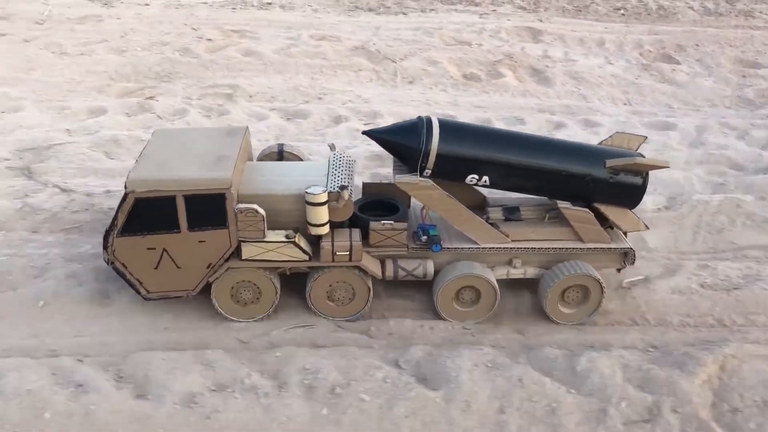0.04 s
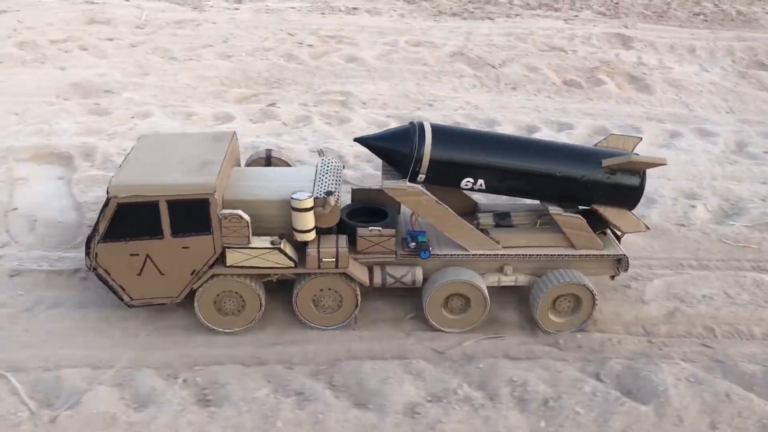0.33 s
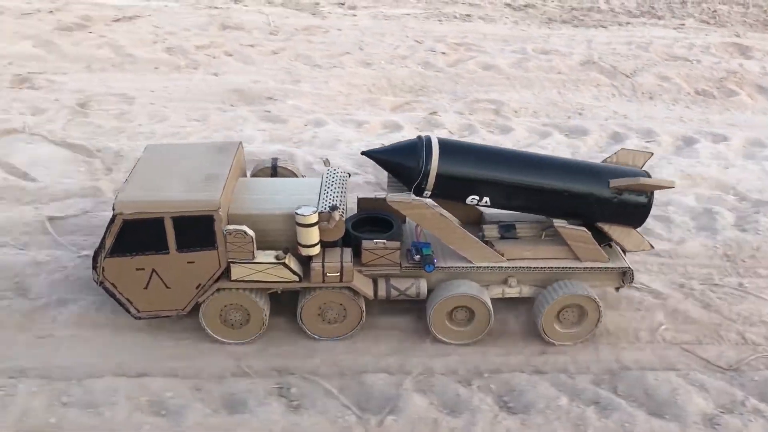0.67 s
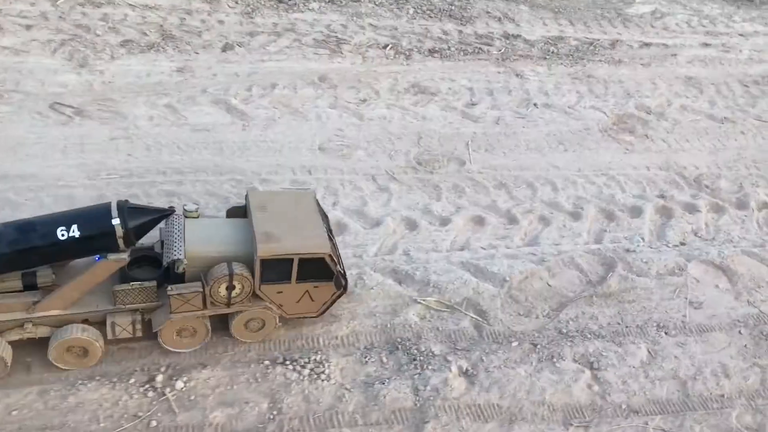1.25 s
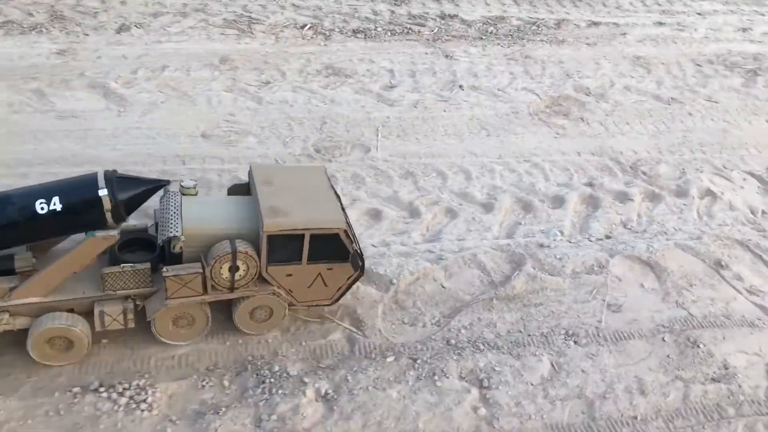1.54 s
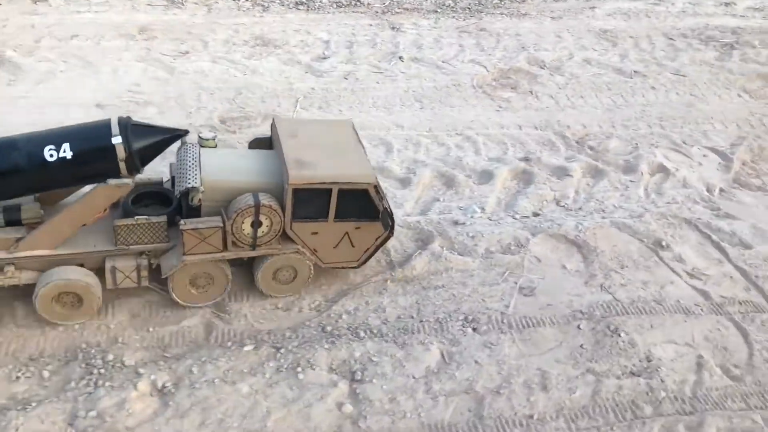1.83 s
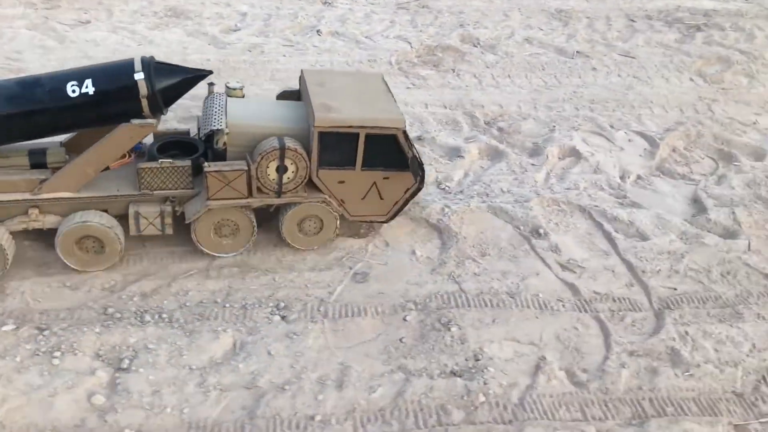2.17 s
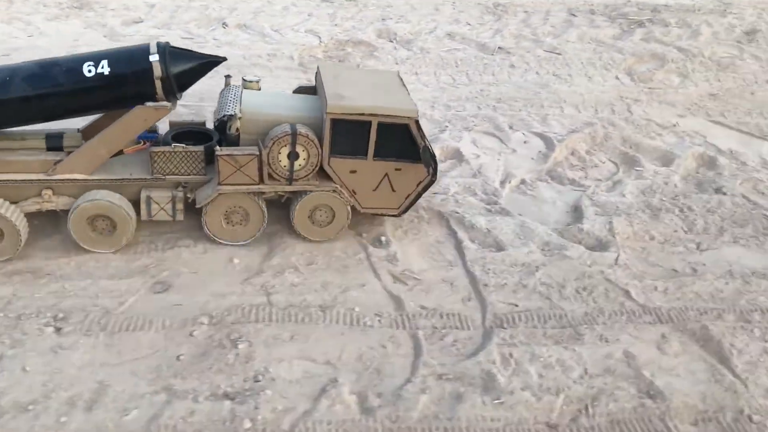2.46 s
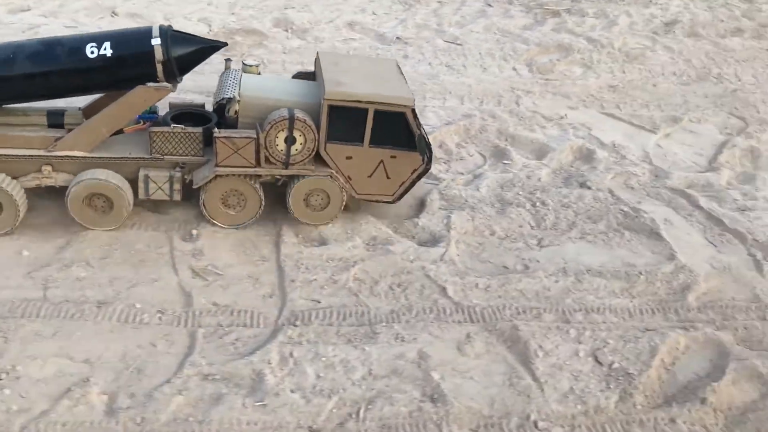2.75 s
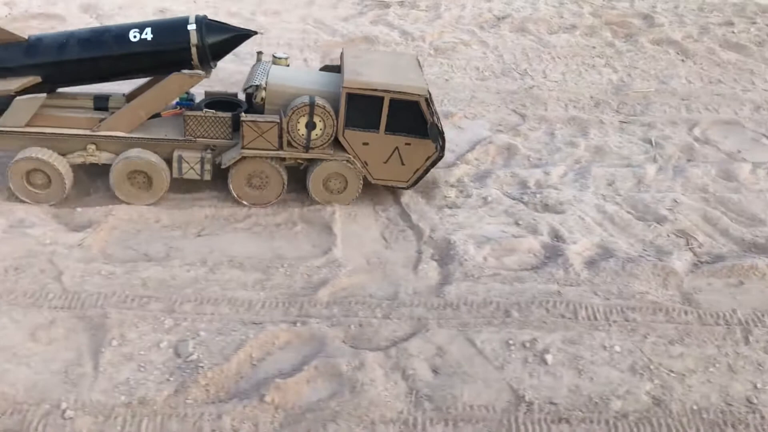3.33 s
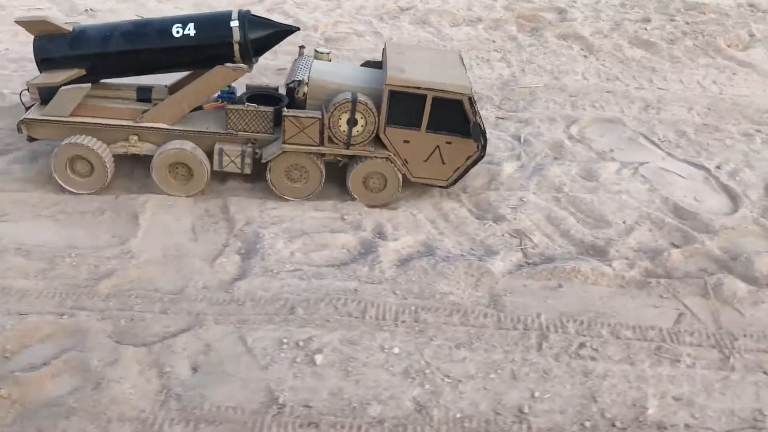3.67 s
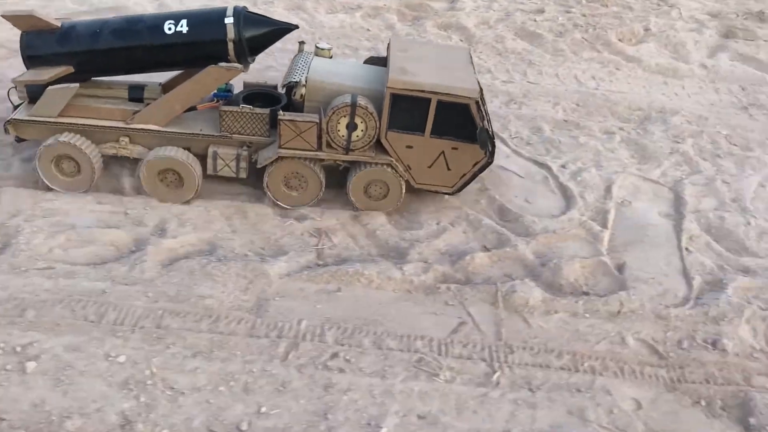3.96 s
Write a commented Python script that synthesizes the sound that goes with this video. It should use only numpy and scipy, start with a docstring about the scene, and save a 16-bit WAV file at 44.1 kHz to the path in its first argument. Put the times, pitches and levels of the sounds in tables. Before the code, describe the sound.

A toy truck's geared motor whines and rattles as it crawls over crunching sand.

```python
"""A toy truck's geared motor whines and rattles as the truck crawls over sand.
The motor surges and sags as the wheels grip; its teeth sound harmonics of the shaft rate and
excite the modes of the hollow body. Sand crunches under the tyres, the frame drums over ruts
and air buffets the microphone. The truck is heard from one side and, after a short break,
from the other."""
import sys
import numpy as np
from scipy import signal
from scipy.fft import rfft, irfft, next_fast_len
from scipy.io import wavfile
from scipy.ndimage import map_coordinates

SR = 44100
rng = np.random.default_rng(int(sys.argv[2]) if len(sys.argv) > 2 else 0)


def to_wav(s):
    """Save 16-bit WAV."""
    ch = np.atleast_2d(s).T  # columns
    pcm = np.round(np.clip(ch, -1, 1) * 32767)  # PCM
    wavfile.write(sys.argv[1], SR, pcm.astype(np.int16))


N = 176400
BREAK_S = 1.163  # the first side gives way to the second


def amp(db):
    """Amplitude ratio of a level in decibels."""
    return 10 ** (np.asarray(db) / 20)


def unit(x):
    """Normalisation to rms 1."""
    return x / np.sqrt(np.mean(x ** 2) + 1e-20)


def clock():
    """Time of each sample in seconds."""
    return np.arange(N) / SR


def curve(rows):
    """Linear interpolation of (seconds, value) rows."""
    return np.interp(clock(), *np.transpose(rows))


def eased(rows):
    """Half-cosine interpolation of (seconds, value) rows, with zero slope at each row."""
    times, values = np.transpose(rows)
    index = np.arange(len(times))
    at = np.interp(clock(), times, index)
    return np.interp(np.floor(at) + np.sin(np.pi / 2 * (at % 1)) ** 2, index, values)


def by_side(first, second):
    """A step from one value to another at the break."""
    return np.where(clock() < BREAK_S, first, second)


def bump(centre_s, half_length_s):
    """Gaussian envelope; the half-length is its standard deviation."""
    return np.exp(-.5 * ((clock() - centre_s) / half_length_s) ** 2)


def wobble(rate):
    """Smooth random modulation through rate knots a second."""
    return map_coordinates(rng.standard_normal(4096), [clock() * rate], mode="wrap")


def filtered(x, response):
    """Linear filtering: the spectrum of x times a frequency response."""
    size = next_fast_len(N + 8192)
    return irfft(rfft(x, size) * response(np.fft.rfftfreq(size, 1 / SR)), size)[:N]


def coloured(x, points):
    """Spectral shaping by (Hz, dB) points, at rms 1."""
    hz, db = np.transpose(points)
    return unit(filtered(x, lambda f: amp(np.interp(np.log(f + 1), np.log(hz), db))))


def resonance(f, hz, width):
    """Frequency response of a damped oscillator; width is its half-power bandwidth in Hz."""
    return 1j * f * width / (hz * hz - f * f + 1j * f * width)


def band_noise(hz, width):
    """White noise through two equal resonators in cascade, at rms 1."""
    return unit(filtered(rng.standard_normal(N), lambda f: resonance(f, hz, width) ** 2))


def blend(clicks, share):
    """Incoherent sum of clicks and white noise; share is the clicks' part of the power."""
    return np.sqrt(share) * unit(clicks) + np.sqrt(1 - share) * rng.standard_normal(N)


def grains(per_second, scatter_db=5.5, decay_s=.00043):
    """Shot noise: grains grate at random instants and their energy decays exponentially."""
    onsets = rng.random(N) < per_second / SR
    sizes = onsets * amp(scatter_db * np.minimum(rng.standard_normal(N), 2.4))
    energy = signal.lfilter([1], [1, -np.exp(-1 / (decay_s * SR))], sizes ** 2)
    return np.sqrt(energy) * rng.standard_normal(N)


def thumps():
    """Envelope of the low thumps as gusts of air buffet the microphone."""
    # Each row: centre in seconds, half-length in seconds, level in dB.
    buffets = [(0.17, 0.016, -41), (0.24, 0.0097, -42), (0.423, 0.006, -42), (0.79, 0.038, -48),
               (1.103, 0.015, -45.5), (2.012, 0.012, -42.5), (2.052, 0.0097, -45), (2.129, 0.0093, -38.5),
               (3.103, 0.014, -37.5), (3.495, 0.0049, -38.5), (3.534, 0.024, -42.5)]
    return sum(amp(db) * bump(s, half_length) for s, half_length, db in buffets)


def air():
    """Turbulence: air on the microphone makes a low rumble that swells with each thump."""
    # Each row: time in seconds, level in dB.
    rumble_levels = [(0, -41), (.1, -46.5), (.6, -47.5), (.9, -45), (1.1, -46), (1.22, -66), (1.45, -66),
                     (1.52, -53), (1.65, -69), (2, -60), (2.25, -62), (2.92, -68), (3.02, -46.5),
                     (3.3, -60), (3.5, -53), (4, -53)]
    # Each row: frequency in Hz, relative spectral level in dB.
    spectrum = [(20, -42), (40, -6), (68, 3), (110, -2.5), (155, -3), (220, -16), (320, -14), (700, -86),
                (2000, -90)]
    envelope = np.hypot(amp(curve(rumble_levels)), amp(-1.5) * thumps())
    return envelope * coloured(rng.standard_normal(N), spectrum)


def chassis():
    """Forced vibration: the frame drums as the wheels roll, harder at each thump."""
    # Each row: time in seconds, level in dB.
    rolling_levels = [(0, -52.5), (1.1, -54), (1.25, -60), (2.05, -53), (2.25, -59), (2.85, -57),
                      (3.1, -53), (3.3, -63), (4, -62)]
    envelope = np.hypot(amp(curve(rolling_levels)), amp(-.5) * thumps())
    return envelope * band_noise(hz=144, width=95)


def scrapes():
    """Friction: tyres and gears rub briefly, each time in a hollow band of noise."""
    # Each row: centre and half-length in seconds, pitch and resonator half-width in Hz, level in dB.
    rubs = [(0.45, 0.01, 4100, 450, -37), (0.517, 0.0051, 3630, 120, -41),
            (0.676, 0.0072, 3620, 120, -37.5), (.745, 0.01, 3460, 200, -39),
            (2.366, 0.0089, 1050, 111, -41.5), (2.384, 0.0052, 1380, 500, -40.5),
            (2.426, .01, 378, 49.6, -41.5), (2.633, 0.0054, 1620, 300, -44),
            (2.882, .005, 1150, 200, -46.5)]
    return sum(amp(db) * bump(s, half_length) * band_noise(hz, 2 * half_width)
               for s, half_length, hz, half_width, db in rubs)


def snaps(hold_s=.00037, t60_s=.011, relative_width=.71):
    """Impact: larger grains crack against the chassis, then die away exponentially."""
    # Each row: start in seconds, level in dB, centre frequency in Hz.
    strikes = [(.1755, -31, 8000), (.3715, -33, 9000), (.4695, -36, 8000), (.7035, -29.5, 5500),
               (.7435, -33, 7000), (.8565, -37, 14000), (.8835, -36, 5400), (1.068, -37, 8000),
               (1.6505, -39, 7000), (1.707, -41, 6000), (2.4295, -37, 9000), (3.8293, -31.5, 9000)]
    t = clock()
    out = np.zeros(N)
    for start, db, hz in strikes:
        decay_db = 60 * np.maximum(t - start - hold_s, 0) / t60_s
        out += amp(db - decay_db) * (t >= start) * band_noise(hz, relative_width * hz)
    return out


def sand(gain_db=4.5, clump_db=2):
    """Granular friction: the tyres crush clumps of tiny grains into a crunch."""
    # One table a side. Each row: time in seconds, relative level in dB.
    side_levels = [
        [(0, -50), (.18, -45.5), (.27, -54), (.34, -47), (.42, -48.5), (.54, -43.5), (.65, -46), (.75, -45.5),
         (.81, -42.5), (.86, -50), (1, -46.5), (1.13, -46)],
        [(1.19, -55.5), (1.52, -54.5), (1.66, -52), (2.2, -52), (2.44, -50), (2.8, -50.5), (3.45, -54),
         (3.8, -51), (4, -53.5)],
    ]
    # Each row: frequency in Hz, relative spectral level in dB.
    spectrum = [(120, -41), (220, 7.5), (1000, -1.5), (3000, 2.5), (5800, 0.5), (8000, -3), (10500, -2.5),
                (13000, -5), (15800, -8)]
    grating = blend(grains(per_second=1400), share=.53)
    clumps = amp(clump_db * np.minimum(wobble(110), 1))
    return amp(by_side(*map(curve, side_levels)) + gain_db) * coloured(grating * clumps, spectrum)


def spray():
    """Bright bursts of shot noise as a slipping tyre throws sand."""
    # Each row: centre in seconds, half-length in seconds, level in dB.
    slips = [(0.337, .012, -43), (0.526, 0.0091, -41.5), (.543, 0.0069, -52), (0.69, .01, -47),
             (0.789, .014, -40.5), (2.42, .015, -50)]
    # Each row: frequency in Hz, relative spectral level in dB.
    spectrum = [(1500, -23), (6000, 2), (10000, 3), (14000, -2), (15800, -7)]
    envelope = sum(amp(db) * bump(s, half_length) for s, half_length, db in slips)
    return envelope * coloured(grains(per_second=2200), spectrum)


def rattle(turns, surge_hz, gain_db=1, db_per_hz=-.0209, swing_db=2.5):
    """Modal response: teeth click and rub, ringing body modes that each waver in level."""
    # Each row: frequency and bandwidth in Hz, relative levels in dB on the first and second side.
    modes = [(337, 30, 3, -4.5), (412.3, 43.4, 2, 3.5), (512, 60, 3.5, 1.5), (678, 150, -1.5, -1.5),
             (870, 180, -4, -3), (1330, 420, -6, -11.5), (1710, 130, -4.5, -38), (2262, 530, -8, -4.5),
             (2770, 390, -7, -47), (3660, 510, -2.5, -10.5), (4350, 390, -2, -4.5), (4605, 400, -2, -3.5),
             (5200, 1460, -46, -13.5), (6600, 970, -15, -12)]
    teeth_per_turn, play_s, scatter_db, eccentricity = 4, .00007, 6, .37
    contacts = np.flatnonzero(np.diff(np.floor(teeth_per_turn * turns)))
    play, size = rng.standard_normal((8192, 2))[:len(contacts)].T
    polarity = rng.choice([-1, 1], 8192)[:len(contacts)]
    at = np.clip(np.round(contacts + play_s * SR * play), 0, N - 1).astype(int)
    clicks = np.bincount(at, amp(scatter_db * size) * polarity, N)
    # The off-centre pinion presses harder once a turn.
    force = blend(clicks, share=.39) * (1 + eccentricity * np.sin(2 * np.pi * turns))
    ring = np.zeros(N)
    for k, (hz, width, *side_db) in enumerate(modes):
        gain = amp(by_side(*side_db) + swing_db * wobble(60))
        ring += (-1) ** k * gain * filtered(force, lambda f: resonance(f, hz, width))
    return amp(gain_db + db_per_hz * surge_hz) * unit(ring)


def whine(turns, surge_hz, db_per_hz=.1588, flicker_db=4):
    """Gear-mesh harmonics: lines at multiples of the shaft rate, louder as the shaft speeds up."""
    # Each entry: the frequency of one line as a multiple of the shaft rate.
    orders = [3, 5, 6, 7, 8, 9, 11, 12, 14, 16, 17, 22]
    # Each row: that line's relative levels in dB on the first and second side.
    line_levels = [(-12.5, -25), (-31, -22), (-14, -21), (-13.5, -23), (-2, -4), (-9, -14), (-15.5, -20),
                   (-2.5, -8.5), (-16, -25), (-17, -13), (-26, -17), (-17, -21)]
    # Each row: time in seconds, extra dB for the low lines, extra dB for the high lines.
    singing = [(.06, 1, -2), (.17, -5, -9), (.29, -3.5, -8.5), (.42, -2, -3), (.6, -4.5, -3),
               (.75, -3.5, -7), (.84, -5.5, -4), (.92, 0.5, 0), (1, -6, 1), (1.08, 1.5, 2.5),
               (1.25, -6, -10), (1.65, -1.5, -14), (1.95, -5, -4), (2.12, -5.5, -4), (2.41, -2.5, 1),
               (2.65, -3, -1), (2.8, -1, -3), (3.08, 2, -2), (3.19, -1, -5), (3.29, 2.5, -2),
               (3.38, -3.5, 0), (3.46, 2, -11), (3.57, 2, -1), (3.78, -4, -9), (4, -1.5, -1)]
    first_high_order, fringe_hz = 11, 110
    fringe_gain, smear_rad = amp(by_side(-7, -3.5)), by_side(.11, .23)
    times, low_db, high_db = np.transpose(singing)
    out = np.zeros(N)
    for order, side_db in zip(orders, line_levels):
        sing_db = np.interp(clock(), times, high_db if order >= first_high_order else low_db)
        contact_db = flicker_db * wobble(70)  # uneven tooth contact
        level_db = by_side(*side_db) + sing_db + db_per_hz * surge_hz + contact_db
        smear = smear_rad * (order / 8) ** 2 * wobble(100)  # phase noise broadens the high lines
        phase = 2 * np.pi * order * turns + smear
        # A rough fringe of narrow-band noise travels with the line.
        fringe = wobble(2 * fringe_hz) * np.sin(phase) + wobble(2 * fringe_hz) * np.cos(phase)
        out += amp(level_db) * (np.sin(phase) + fringe_gain * fringe)
    return out


def motor(flutter_hz=1.2):
    """Frequency modulation: one shaft, surging and sagging, drives both whine and rattle."""
    # Each row: time in seconds, shaft rate in turns per second.
    shaft_rates = [(0, 291), (.045, 305), (.11, 284), (.178, 311), (.235, 275), (.298, 314), (.365, 286),
                   (.415, 303), (.47, 288), (.515, 301), (.6, 283), (.652, 305), (.71, 288), (.768, 306),
                   (.835, 280), (.918, 309), (1.01, 277), (1.09, 305), (1.15, 284), (1.27, 277),
                   (1.34, 305), (1.425, 274), (1.497, 305), (1.56, 283), (1.645, 305), (1.725, 292),
                   (1.77, 303), (1.808, 287), (1.865, 303), (1.92, 292), (2.03, 295), (2.075, 285),
                   (2.135, 292), (2.19, 278), (2.32, 294), (2.36, 279), (2.42, 276), (2.505, 302),
                   (2.565, 284), (2.68, 295), (2.77, 308), (2.825, 272), (2.915, 307), (2.995, 268),
                   (3.09, 300), (3.15, 267), (3.285, 289), (3.35, 271), (3.46, 303), (3.525, 279),
                   (3.57, 288), (3.74, 267), (3.88, 286), (3.945, 275), (4, 286)]
    # One table a side. Each row: time in seconds, gain of the gearbox sound in dB.
    side_gains = [
        [(0, -44.5), (.25, -41), (.45, -42.5), (.8, -41.5), (1.13, -43.5)],
        [(1.19, -50.5), (1.45, -49), (1.7, -47.5), (2.3, -45.5), (2.9, -46), (3.35, -47), (3.6, -45), (4, -44)],
    ]
    shaft_hz = eased(shaft_rates)
    turns = np.cumsum(shaft_hz + flutter_hz * wobble(70)) / SR
    surge_hz = shaft_hz - shaft_hz.mean()
    return amp(by_side(*map(curve, side_gains))) * (whine(turns, surge_hz) + rattle(turns, surge_hz))


def scene():
    """Superposition of truck, ground and air in one channel."""
    return (motor() + chassis() + sand() + spray() + snaps() + scrapes() + air())[None]


def record(dry):
    """A linear fade out and in at the break, then an ideal low-pass filter."""
    fade_out_s, fade_in_s, cutoff_hz = .03, .021, 15800
    fade = np.minimum(np.abs(clock() - BREAK_S) / by_side(fade_out_s, fade_in_s), 1)
    return filtered(dry[0] * fade, lambda hz: hz < cutoff_hz)[None]


dry = scene()
out = record(dry)
to_wav(out)
```